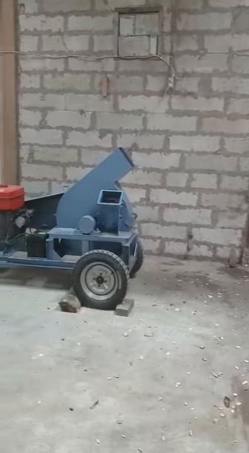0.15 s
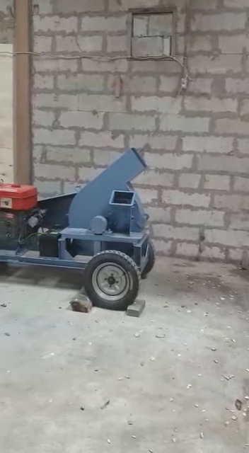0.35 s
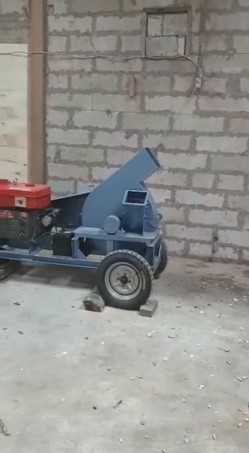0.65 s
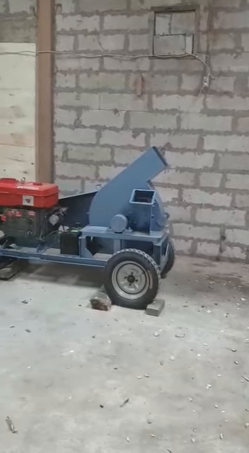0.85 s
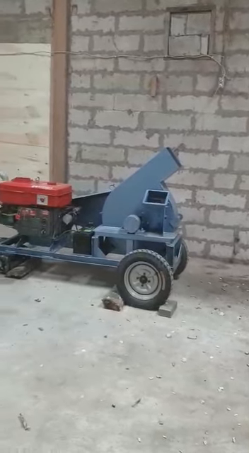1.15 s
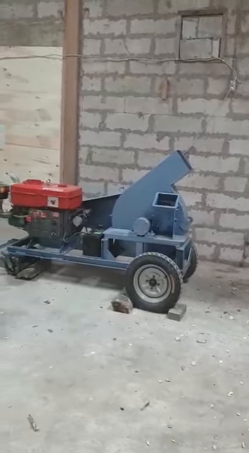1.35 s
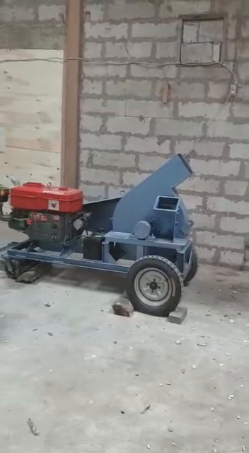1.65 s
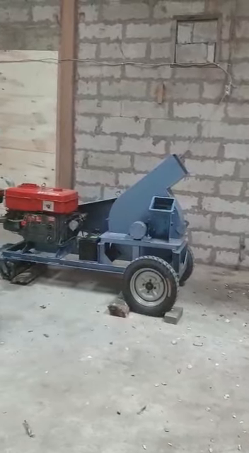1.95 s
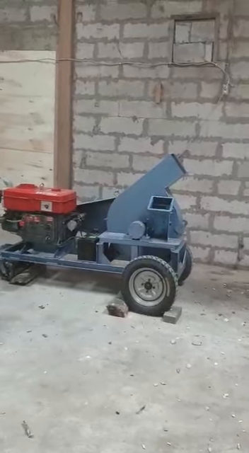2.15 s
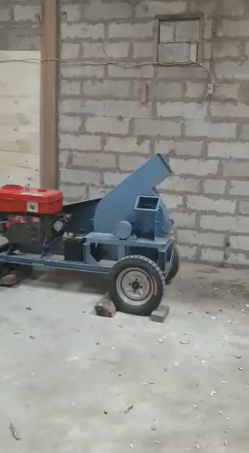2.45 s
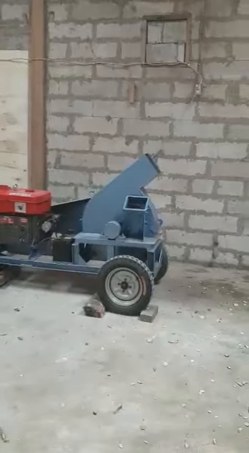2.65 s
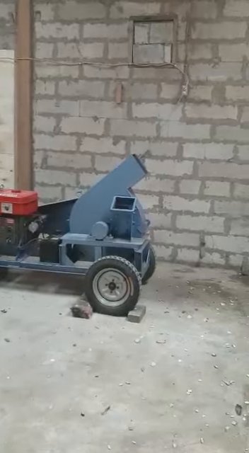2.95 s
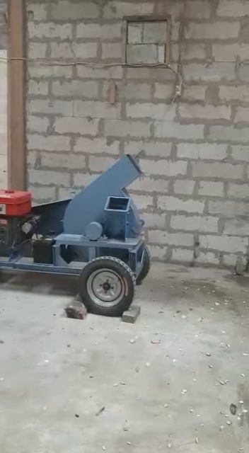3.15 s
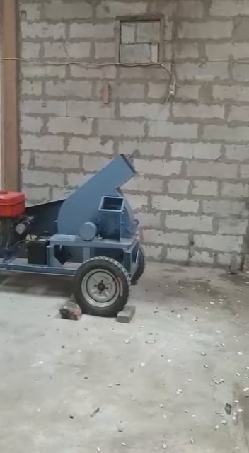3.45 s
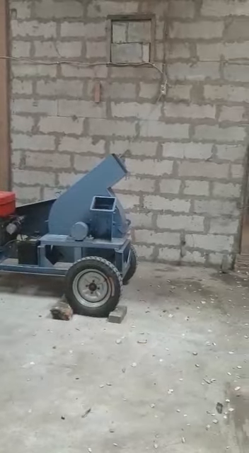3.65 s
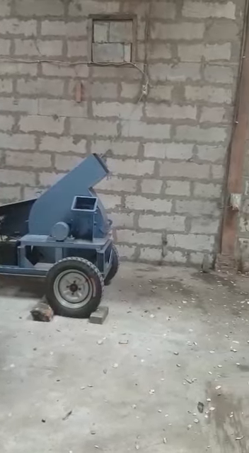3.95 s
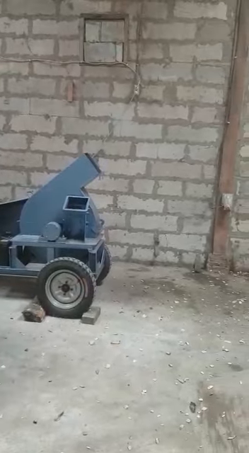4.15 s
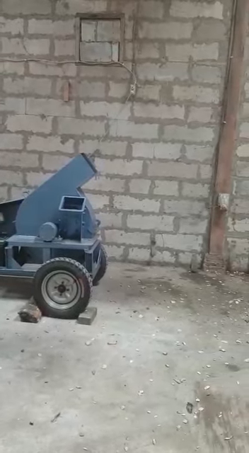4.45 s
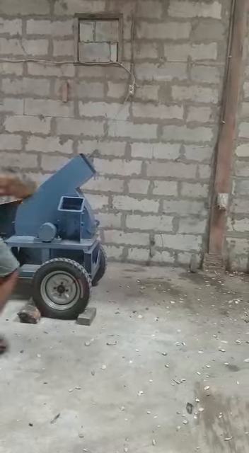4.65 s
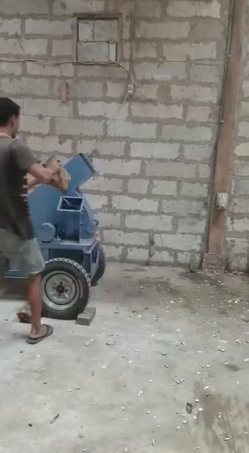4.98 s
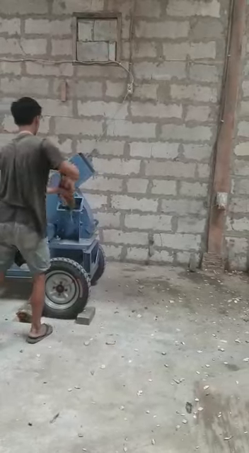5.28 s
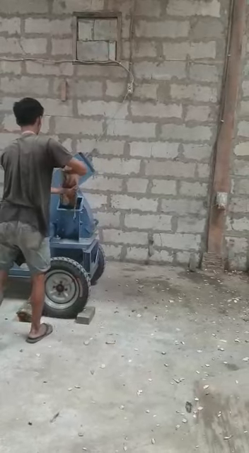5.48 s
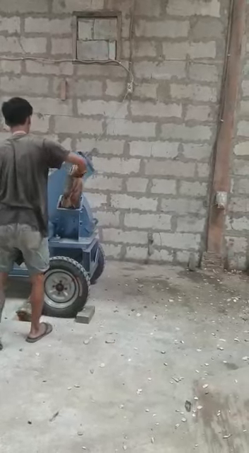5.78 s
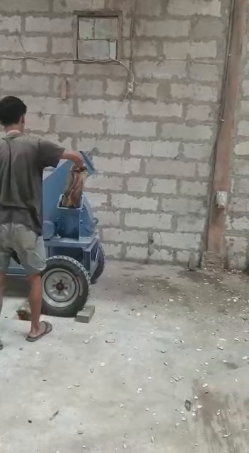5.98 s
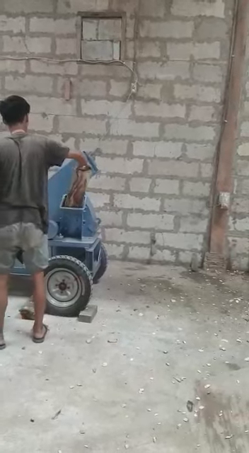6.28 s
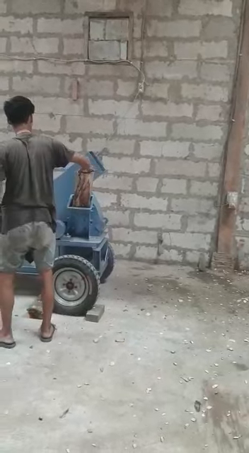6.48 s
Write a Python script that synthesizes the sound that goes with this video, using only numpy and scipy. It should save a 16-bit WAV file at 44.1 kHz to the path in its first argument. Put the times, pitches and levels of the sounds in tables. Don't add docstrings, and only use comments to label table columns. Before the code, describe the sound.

A one-cylinder diesel runs an empty wood chipper at steady speed in a hard block-walled shed. Rapid thumps, knocks and valve clanks fuse into a rough drone with ringing panels. A hand muffles the phone's two microphones until almost three seconds; after a tiny dropout the left side bursts open, bright and hissing, while the right turns bassy and dull.

```python
import sys
import numpy as np
from scipy import signal
from scipy.fft import rfft, irfft
from scipy.io import wavfile
from scipy.ndimage import uniform_filter1d, map_coordinates

SR = 44100
rng = np.random.default_rng(int(sys.argv[2]) if len(sys.argv) > 2 else 0)


def nominal_scale(level):
    x = np.asarray(level, float) / 20
    return 10 ** x


def int16_out(signal):
    q = np.round(np.clip(np.atleast_2d(signal).T, -1, 1) * 32767)
    wavfile.write(sys.argv[1], SR, q.astype(np.int16))


N = 291942
FIRING_HZ = 16.91
SHAPE_STEP = 8192

# (multiple of the firing rate, level/dB rms)
EXHAUST = [(1, -62.7), (2, -44.7), (3, -45.3), (4, -42.1), (5, -40.1), (6, -49.7), (7, -31.5), (8, -27.8),
           (9, -40.1), (10, -32.7), (11, -30.1), (12, -42.5), (13, -38.3), (14, -33.5), (15, -33.6),
           (16, -23.2), (17, -39.4), (18, -28.9), (19, -32.7), (20, -32.3), (21, -31.8), (22, -32.1),
           (23, -30.0), (24, -26.1), (25, -29.7), (26, -30.0), (27, -25.3), (28, -31.5), (29, -31.9),
           (30, -34.8)]
# (f/Hz, level/dB rms)
PANELS = [(522.2, -36.5), (538.3, -37), (592.2, -34.5), (640.6, -34.5), (678.3, -35), (710.6, -42),
          (812.9, -30), (931.3, -45.5), (1034, -39.5), (1066, -39.5), (1130, -35), (1184, -48),
          (1249, -37.5), (1303, -40), (1421, -45.5), (1556, -40.5), (1642, -45.5), (2315, -39), (2552, -46)]
# (sound dips t/s, port shut t/s, new grip t/s)
SLIP = [
    (2.889, 2.891, 2.935),
    (2.874, 2.876, 2.905),
]


def evened(x):
    return x / np.sqrt(np.mean(abs(x) ** 2) + 1e-20)


def read(points, hz, axis=1):
    points = np.transpose(points)
    return np.interp(np.log(hz + 1), np.log(points[0] + 1), points[axis])


def panel_multiples():
    return np.round(np.transpose(PANELS)[0] / FIRING_HZ).astype(int)


def cycles():
    # (t/s, lead over steady running/firing cycles)
    lead = [(0, -.005), (.9, -.011), (1.5, -.0146), (2.2, -.0095), (2.9, -.0018), (3.4, .0003),
            (4.55, .0138), (5.4, .0006), (6.2, -.0132), (6.62, -.015)]
    t = np.arange(N) / SR
    return FIRING_HZ * t + np.interp(t, *np.transpose(lead))


def blows(turn):
    # (share of the cycle, level/dB, ring time/cycles)
    blow_table = [(.52, -0.5, 0.37), (.76, -6, 0.98), (0.93, 0.5, 0.42), (0.22, -3.5, 0.2)]
    return sum(nominal_scale(db) ** 2 * np.exp(-((turn - at) % 1) / ring * 2) for at, db, ring in blow_table)


def exhaust():
    arrival = [(1.5, .12), (2.5, -.12), (3.5, -.12), (4.5, .27), (6.5, .22), (8.5, .47), (9.5, 0.665),
               (10.5, 0.371), (11.5, 0.008), (15.5, 0.179), (19.5, 0.676), (20.5, 0.631), (22.5, 0.0),
               (25.5, 0.994), (26.5, 1.2), (27.5, 0.633), (29.5, 0.034)]
    multiple, db = np.transpose(EXHAUST)
    late = np.cumsum(np.interp(multiple - .5, *np.transpose(arrival)))
    pulse_turn = .7
    return nominal_scale(db) * np.exp(1j * (pulse_turn - 2 * np.pi * late))


def knock(count, alike=0.5):
    # (f/Hz, level/dB per Hz)
    knock_spectrum = [(290, -32), (500, 10.5), (655, -10), (764, 0.5), (794, -7), (833, -4), (858, -5),
                      (1270, -1), (1360, -6.5), (1910, -12), (2250, -2.5), (2450, -10), (5000, -22),
                      (6500, -46), (11000, -120)]
    knock_db, panels_db = -20, 4.5
    # (f/Hz, width/Hz, level/dB rms, share of the cycle)
    rings = [(608, 78, -33, .35), (664, 23, -32.5, .8), (949, 54, -34, .5), (1148, 39, -32, .73),
             (1660, 110, -40.5, .5), (2237, 42, -35, .52), (2225, 48, -38, 0.44)]

    hz = np.arange(count) * FIRING_HZ
    blow_shape = np.sqrt(blows(np.arange(2048) / 2048))
    rattle = rfft(rng.standard_normal((2, 2048)) * blow_shape)[:, :count]
    rattle[1] = alike * rattle[0] + np.sqrt(1 - min(alike, 1) ** 2) * rattle[1]
    rattle = rattle / abs(rattle) ** .4
    heights = rattle * nominal_scale(read(knock_spectrum, hz))
    heights = heights * nominal_scale(knock_db) / np.linalg.norm(heights[0, len(EXHAUST):])

    for ring_hz, width, db, at in rings:
        ring = np.exp(-2j * np.pi * np.arange(count) * at) / (1 + 2j * (hz - ring_hz) / width)
        heights = heights + nominal_scale(db) * ring / np.linalg.norm(ring)

    sing = panel_multiples()
    heights[:, sing] *= nominal_scale(np.transpose(PANELS)[1] + panels_db) / abs(heights[:, sing])
    return heights


def engine(count=296, uneven_db=0.5):
    # (f/Hz, share of each line that drifts)
    drift = [(200, .08), (400, .3), (1200, .45), (2300, .6)]
    # (multiple, from t/s, to t/s, change/dB)
    spells = [(32, 0, 2.9, -9), (40, 0, 2.9, -4), (42, 2.9, 7, 5), (131, 3.6, 4.3, 2), (131, 0, 2.9, -6),
              (137, 0, 4.3, -10), (137, 4.7, 5.9, 4), (151, 4.5, 6, 5), (40, 4.9, 7, -8)]

    heights = knock(count)
    heights[:, 1:len(EXHAUST) + 1] = exhaust()
    steps = N // SHAPE_STEP + 3
    a, b = rng.standard_normal((steps, 2, count, 2)).T
    wander = read(drift, np.arange(count) * FIRING_HZ)
    wander[panel_multiples()] *= .55
    moved = heights * (1 + wander * (a + 1j * b).T / np.sqrt(2)) / np.sqrt(1 + wander ** 2)
    for multiple, start, end, db in spells:
        first, last = round(start * SR / SHAPE_STEP), round(end * SR / SHAPE_STEP)
        moved[first:last, :, multiple] *= nominal_scale(db)

    shapes = irfft(moved, 4096) * 4096 / np.sqrt(2)
    turn = cycles()
    at = [np.arange(N) / SHAPE_STEP, turn % 1 * 4096]
    out = np.array([map_coordinates(shapes[:, c], at, order=1, mode="grid-wrap") for c in range(2)])
    strength_db = uneven_db * rng.standard_normal(round(turn[-1]) + 3)
    return out * nominal_scale(np.interp(turn + 1, np.arange(len(strength_db)), strength_db))


def valve_gear(late=.07, burst_s=0.0035):
    # (f/Hz, t60/s, level/dB rms, share of the cycle, spread/dB)
    clanks = [
        (2243, 0.054, -34.5, 0.58, 1.8),
        (1144, 0.032, -33, .72, 3.5),
        (428, 0.051, -31, .2, 1.5),
    ]
    turn, t = cycles(), np.arange(2600) / SR
    out = np.zeros((2, N))
    for hz, t60, db, at, spread_db in clanks:
        luck = rng.standard_normal((round(turn[-1]) + 2, 2))
        hits = np.searchsorted(turn, np.arange(len(luck)) + at + late * luck[:, 0])
        train = np.zeros(N + 1)
        train[hits] = nominal_scale(spread_db * luck[:, 1])
        burst_power = signal.oaconvolve(train[:N], np.exp(-t / burst_s))[:N]
        bursts = burst_power * rng.standard_normal((2, N))
        ring = nominal_scale(-60 * t / t60) * np.sin(2 * np.pi * hz * t)
        out += nominal_scale(db) * evened(signal.oaconvolve(bursts, ring[None], axes=1)[:, :N])
    return out


def guards():
    # (start t/s, length/s, f/Hz, width/Hz, level/dB rms)
    buzzes = [(.15, 0.45, 2220, 70, -36), (.55, 1.1, 2250, 70, -33), (3.0, .3, 2250, 90, -32),
              (3.548, .5, 2210, 60, -30), (4.549, 1.0, 2290, 80, -30.5), (5.148, .35, 2180, 70, -33),
              (6.05, 0.53, 2240, 90, -34), (5.02, .2, 426, 50, -27), (5.7, 0.51, 435, 60, -27),
              (4.7, 0.064, 1290, 900, -28), (5.8, .1, 1200, 500, -30)]
    shake = np.sqrt(uniform_filter1d(blows(cycles()), size=300))
    out = np.zeros((2, N))
    for start, length, hz, width, db in buzzes:
        first = round(start * SR)
        t = np.arange(first, min(first + round(length * SR), N)) / SR
        span = slice(first, first + len(t))
        luck = rng.standard_normal((2, 2, 2 * SR))[:, :, :len(t)]
        r = np.exp(-np.pi * width / SR)
        slow = signal.lfilter([1], [1, -2 * r, r * r], luck[0] + 1j * luck[1])
        buzz = evened((slow * np.exp(2j * np.pi * hz * t)).real * shake[span])
        swell = np.sqrt(np.sin(np.pi * np.linspace(0, 1, len(t))).clip(0))
        out[:, span] += nominal_scale(db) * buzz * swell
    return out


def air(patchy_db=0.92, gated=0.37):
    # (f/Hz, level/dB per Hz)
    hiss_spectrum = [(25, -22), (130, -15), (220, -17), (400, -11), (650, -15), (1200, -15), (1900, -19),
                     (2250, -17), (2700, -18.5), (4200, -19.5), (5600, -25), (6300, -27.5), (7500, -30),
            (8400, -36.5), (9600, -31), (11700, -27.5), (15600, -42)]
    # (f/Hz, likeness 0 to 1)
    likeness = [(60, 0.8), (250, 0.39), (600, 0.57), (1500, 0.54), (4000, 0.18), (9000, .1)]
    air_db, rumble_edge_hz = -17.5, 140

    frames, hz = N // 256 + 5, np.fft.rfftfreq(1024, 1 / SR)
    a, b, c, d, patches = rng.standard_normal((frames, 513, 5)).T
    patches = uniform_filter1d(patches, size=14, axis=0)
    patches = evened(uniform_filter1d(patches, size=12, axis=1))
    same = np.clip(read(likeness, hz), 0, 1)[:, None]
    left = a + 1j * b
    z = np.array([left, same * left + np.sqrt(1 - same ** 2) * (c + 1j * d)])
    z = z * nominal_scale(read(hiss_spectrum, hz)[:, None] + patchy_db * patches)
    z = z / (1 + (rumble_edge_hz / (hz + 1)) ** 2)[:, None]
    noise = signal.istft(z, nperseg=1024, noverlap=768)[1][:, :N]

    puffs = uniform_filter1d(blows(cycles()), size=450)
    gated = np.clip(gated, 0, 1)
    gate = np.sqrt(1 - gated + gated * puffs / puffs.mean())
    return nominal_scale(air_db) * evened(noise) * gate


def scene():
    return engine() + valve_gear() + air() + guards()


def ducking(t):
    # (t/s, depth/dB)
    ducks = [(.31, -0.5), (1.29, 2), (1.96, 0.5), (3.34, 4), (3.57, 1.5), (3.66, 3.5), (3.84, 3.5),
             (4.10, 2), (4.75, 1), (4.89, .8), (5.20, 3), (5.36, 4), (5.55, 3), (5.99, 2), (6.22, 3),
             (6.38, 2.5), (6.50, 3)]
    fall_s, recover_s = 0.018, 0.12
    s, depth_db = np.transpose(ducks)
    since = np.maximum(t[:, None] - s + fall_s / 2, 0)
    return -(np.minimum(since / fall_s, 1) * np.exp(-since / recover_s)) @ depth_db


def right_grip(t, slipped):
    if not slipped:
        return 2.5 - 1.5 * t
    loose_db, settle_s = 6.5, 0.23
    squeeze_from_s, squeeze_db_per_s = 5.2, -3
    settle = loose_db * np.exp(-np.maximum(t - SLIP[1][2], 0) / settle_s)
    return settle + squeeze_db_per_s * np.maximum(t - squeeze_from_s, 0)


def ports(x, slipped):
    # (f/Hz, left covered/dB, right covered/dB, right pressed/dB)
    hand = [(59.5, -0.5, -0.5, 5), (107, -0.5, -3.5, 4.5), (166, 0.6, -3.5, -1.5),
            (255.6, -4.5, -10.5, -6.5), (417, -18.5, -23.5, -21.5), (617, -12, -19.5, -21.5),
            (910, -8.5, -16.5, -29.5), (1580, -12, -20, -31), (2220, -9, -16, -22), (2940, -18, -32.5, -88),
            (5060, -17, -30.5, -71), (7950, -23, -52, -107), (12200, -19.5, -41, -102)]
    # (f/Hz, phase/radians)
    right_lag = [(30, .6), (100, 1.1), (300, 1.1), (600, 1.4), (1100, .6), (1500, 0)]
    right_late_s = 5.5 / SR
    # (t/s, nearness/dB, turn towards the exhaust/dB)
    aim = [(0, 1, 0.5), (.3, 3, -0.5), (1.9, 2, 0), (2.1, 1, -0.5), (2.8, -1.5, 1), (2.96, 3.2, 1),
           (3.1, 3, 3.5), (3.3, 2, 4), (3.65, 2.5, 0), (4.1, 1.5, 0.5), (4.7, 1, 1.5), (4.97, -.3, -1.2),
           (5.2, 1, -1), (5.55, 1, -1), (5.85, 3.5, -4.5), (6.2, 1, -1), (6.62, 0.5, -0.5)]
    bands_hz = [150, 500, 2500]
    near_share = [0.81, 0.8, 0.52]
    face_share = [1.07, -.2, .25]
    duck_share = [1.45, 1.36, 0.47]

    hz, t, z = signal.stft(x, SR, nperseg=2048, noverlap=1536)
    s, near, face = np.transpose(aim)
    this_grip = (s >= SLIP[0][1]) == slipped
    near = np.interp(t, s[this_grip], near[this_grip])
    face = np.interp(t, s[this_grip], face[this_grip])
    bands = np.outer(near_share, near) + np.outer(face_share, face) + np.outer(duck_share, ducking(t))
    shares = np.array([read(np.c_[bands_hz, row], hz) for row in np.eye(3)])

    left_db = shares.T @ bands + (0 if slipped else read(hand, hz, axis=1)[:, None])
    right_db = right_grip(t, slipped) + read(hand, hz, axis=3 if slipped else 2)[:, None]
    lag = np.exp(-1j * (read(right_lag, hz) + 2 * np.pi * hz * right_late_s))[:, None]
    heard = z * np.array([nominal_scale(left_db), nominal_scale(right_db) * lag])
    return signal.istft(heard, SR, nperseg=2048, noverlap=1536)[1][:, :N]


def limiter(heard, knee=.8):
    over = np.maximum(abs(heard) - knee, 0)
    return heard - np.sign(heard) * (over - (1 - knee) * np.tanh(over / (1 - knee)))


def band_limit(x):
    return signal.sosfilt(signal.butter(12, 15740, fs=SR, output="sos"), x)


def record(dry):
    t = np.arange(N) / SR
    before = np.array([np.interp(t, span[:2], [1, 0]) for span in SLIP])
    after = np.array([np.interp(t, span[1:], [.15, 1], left=0) for span in SLIP])
    heard = before * ports(dry, False) + after * ports(dry, True)
    return band_limit(limiter(heard))


dry = scene()
out = record(dry)
int16_out(out)
```